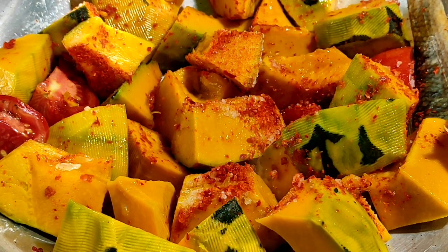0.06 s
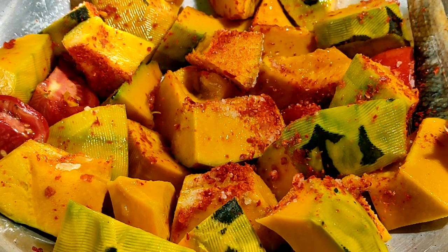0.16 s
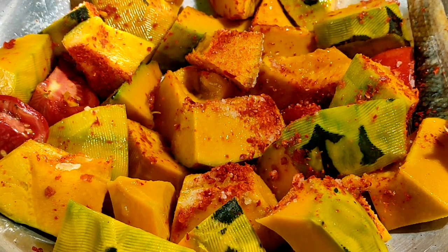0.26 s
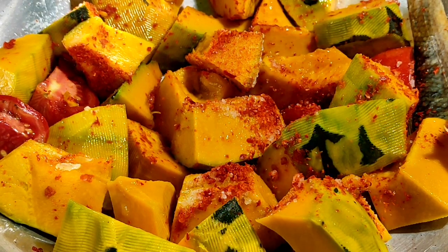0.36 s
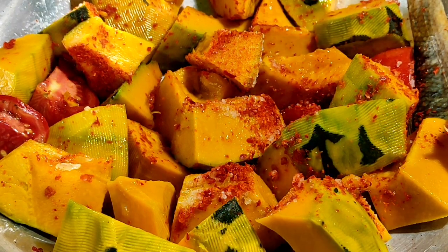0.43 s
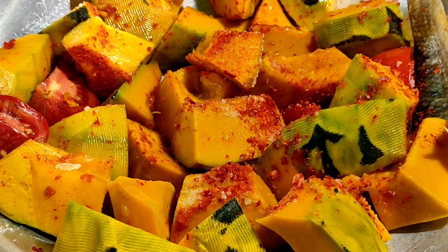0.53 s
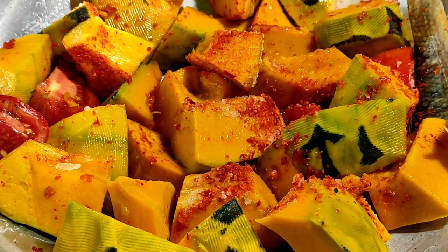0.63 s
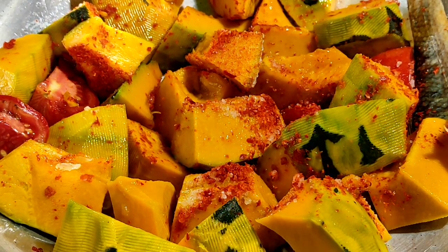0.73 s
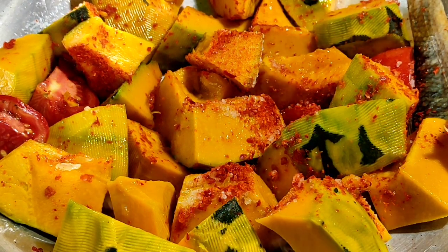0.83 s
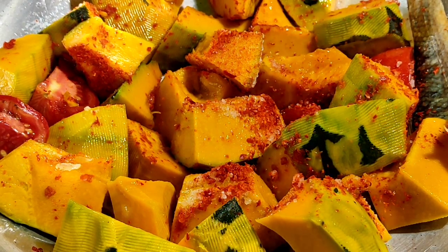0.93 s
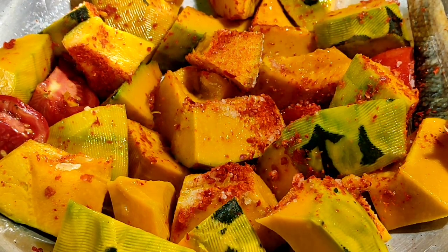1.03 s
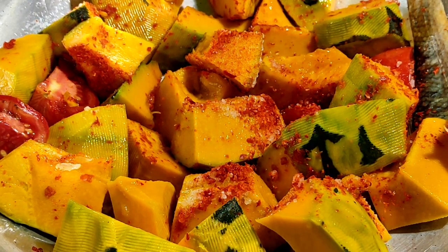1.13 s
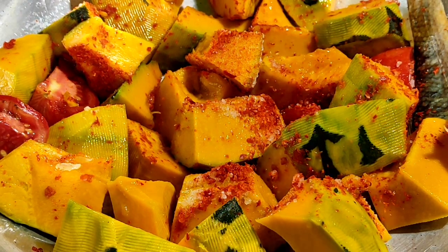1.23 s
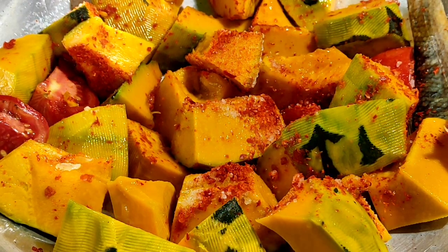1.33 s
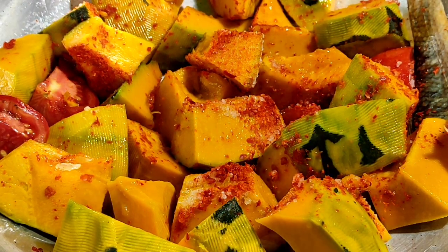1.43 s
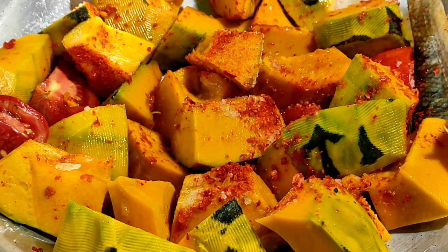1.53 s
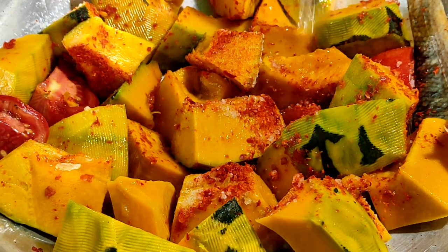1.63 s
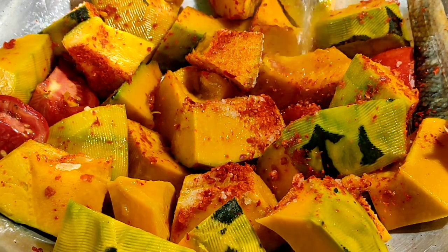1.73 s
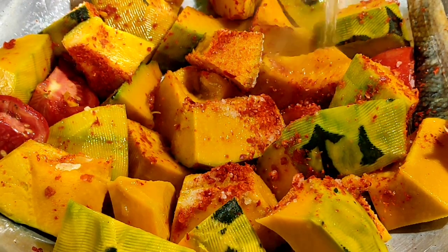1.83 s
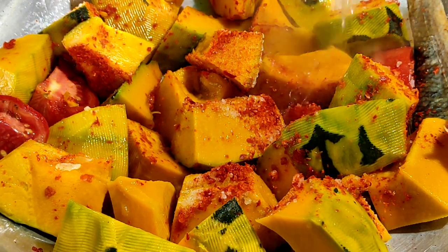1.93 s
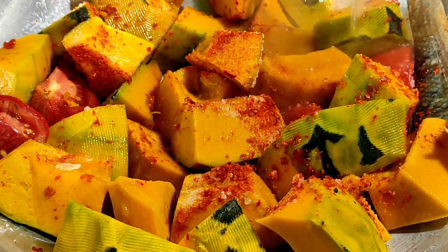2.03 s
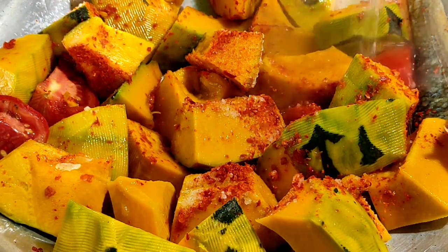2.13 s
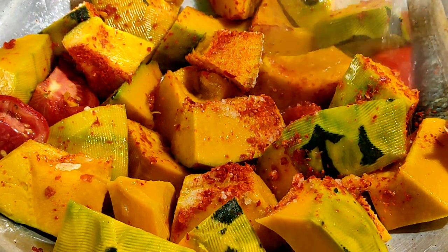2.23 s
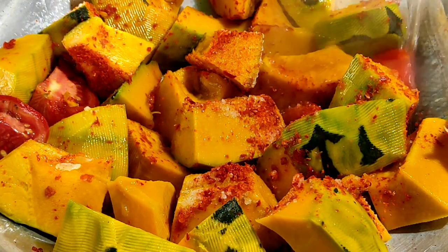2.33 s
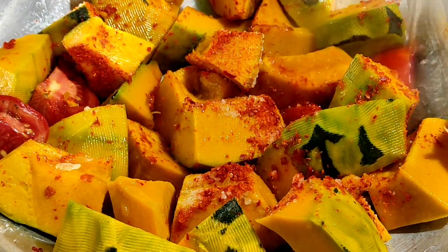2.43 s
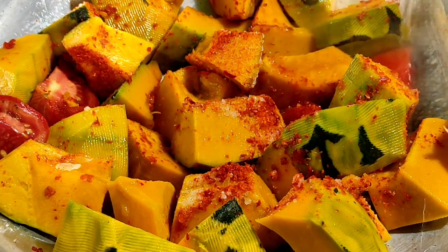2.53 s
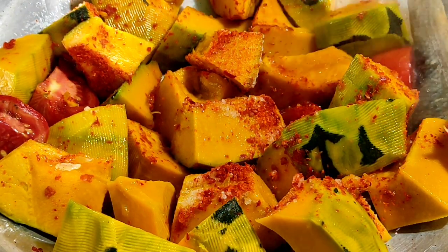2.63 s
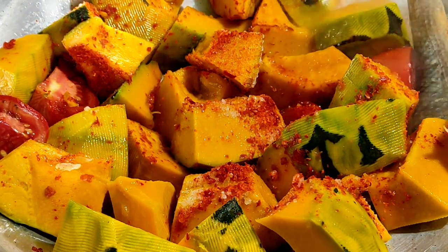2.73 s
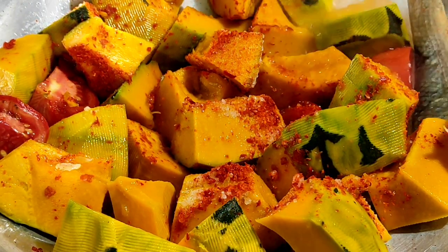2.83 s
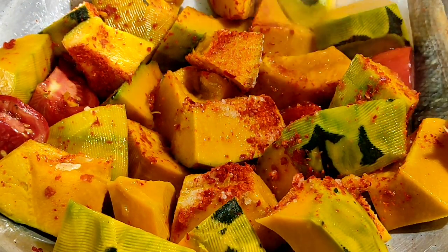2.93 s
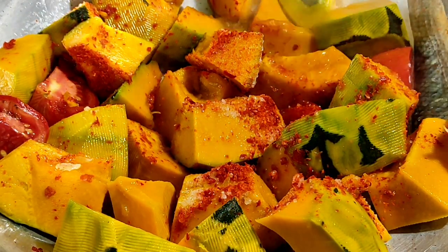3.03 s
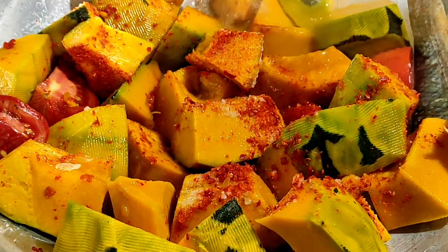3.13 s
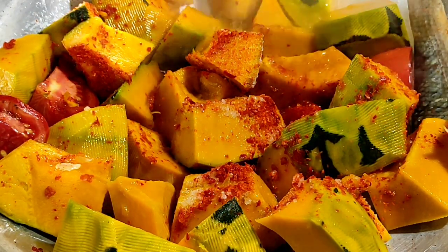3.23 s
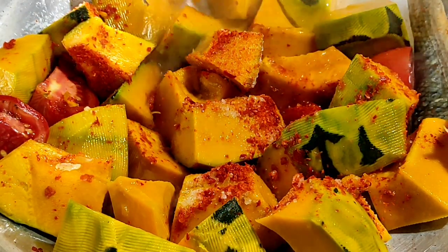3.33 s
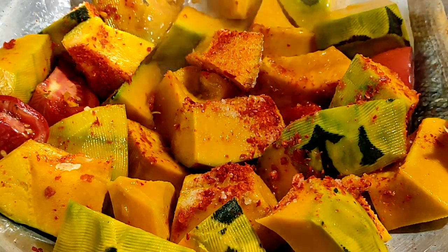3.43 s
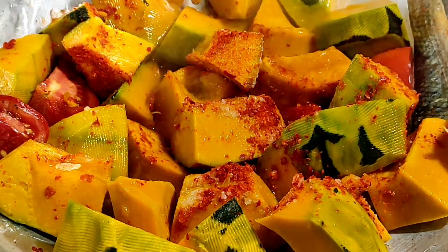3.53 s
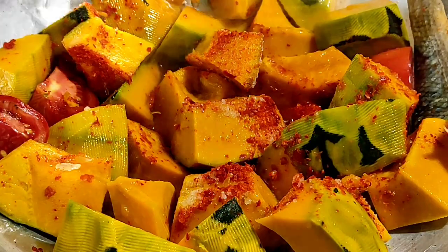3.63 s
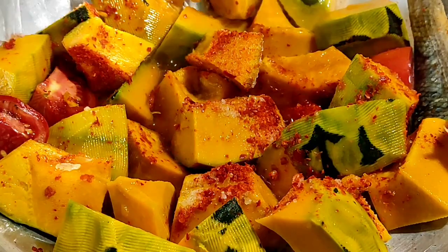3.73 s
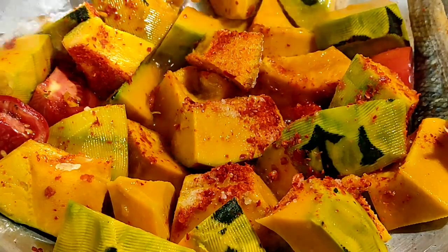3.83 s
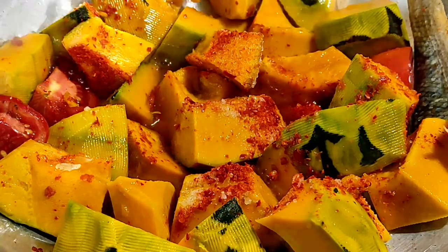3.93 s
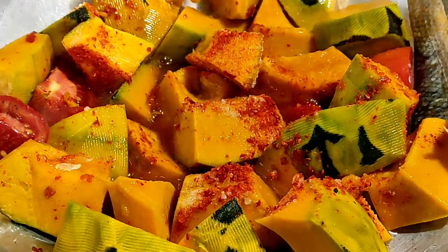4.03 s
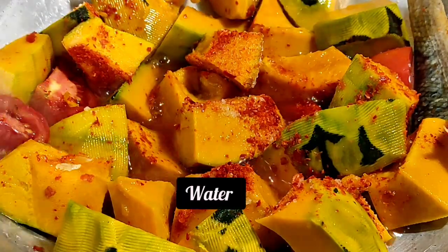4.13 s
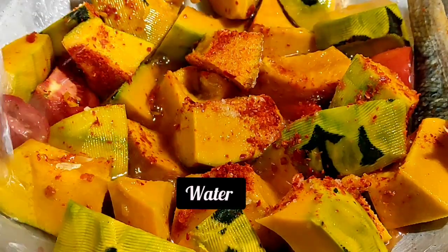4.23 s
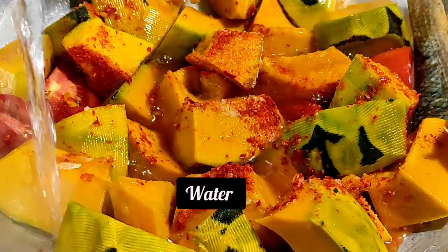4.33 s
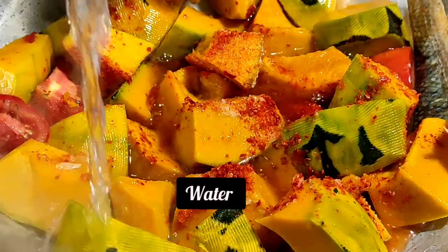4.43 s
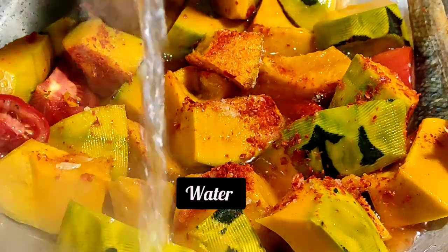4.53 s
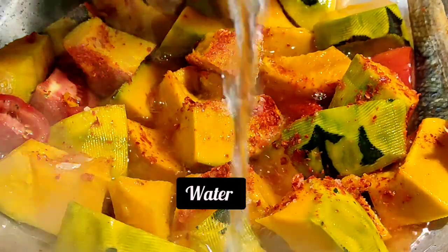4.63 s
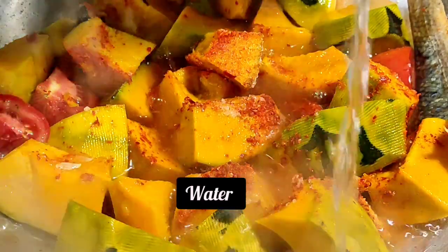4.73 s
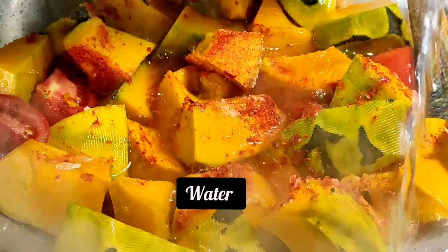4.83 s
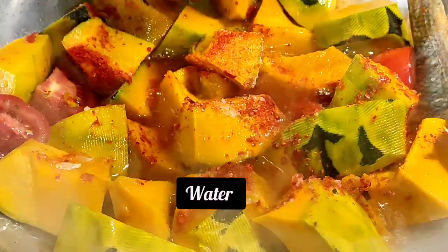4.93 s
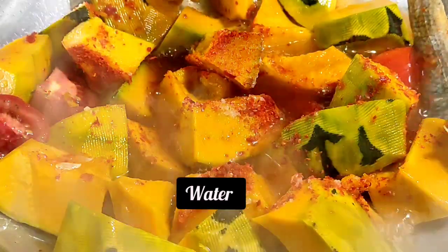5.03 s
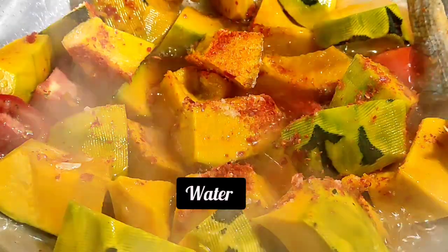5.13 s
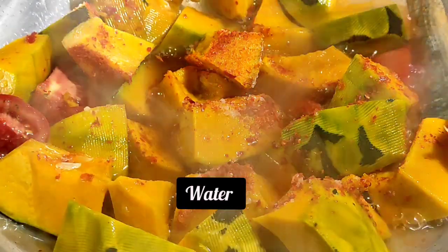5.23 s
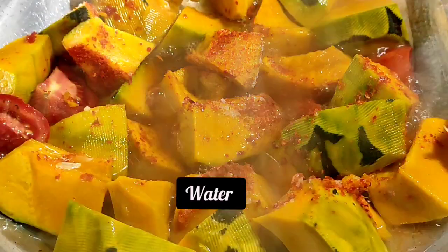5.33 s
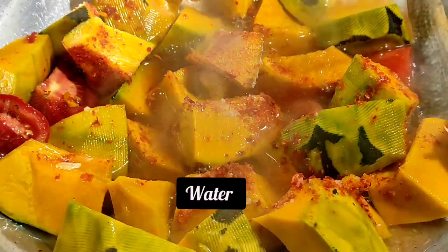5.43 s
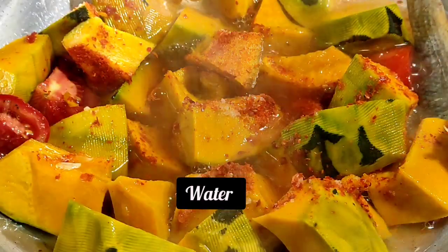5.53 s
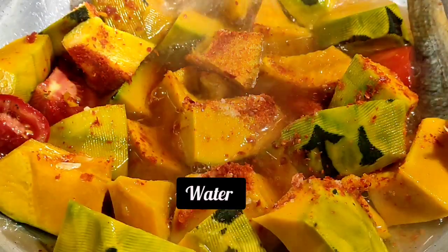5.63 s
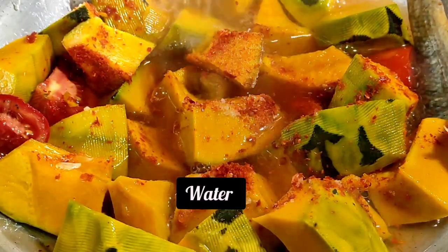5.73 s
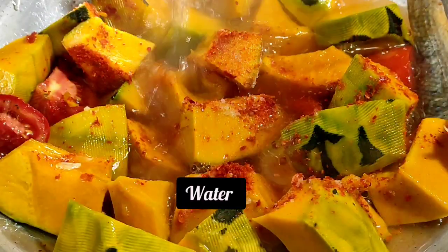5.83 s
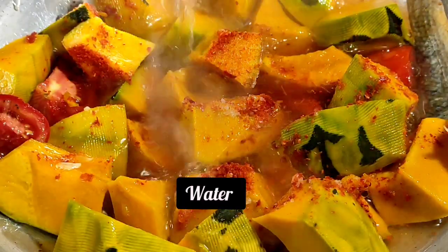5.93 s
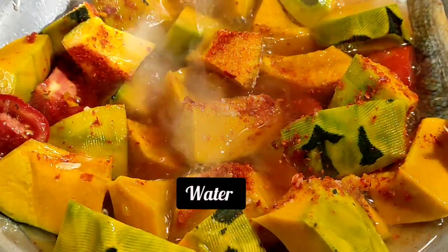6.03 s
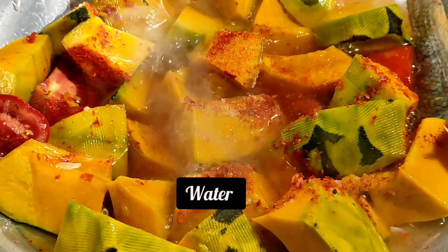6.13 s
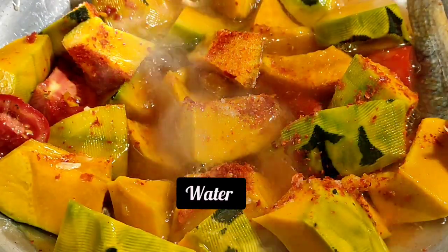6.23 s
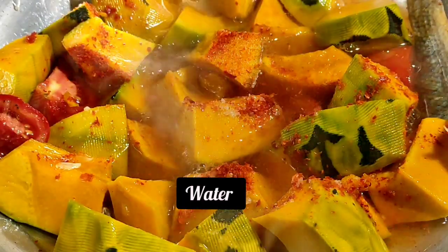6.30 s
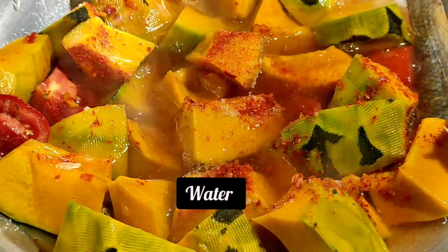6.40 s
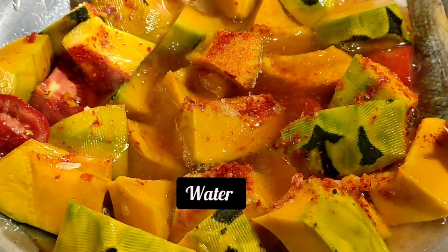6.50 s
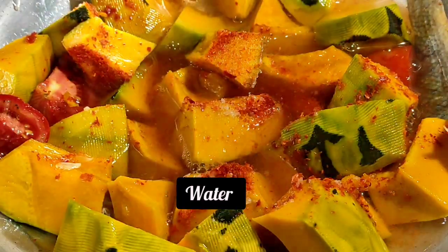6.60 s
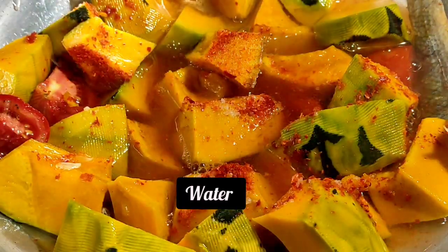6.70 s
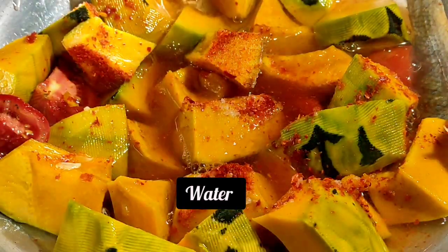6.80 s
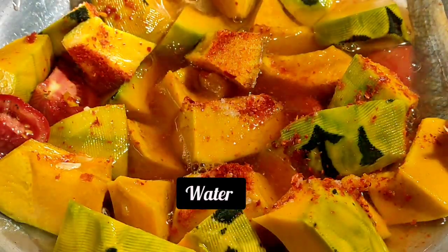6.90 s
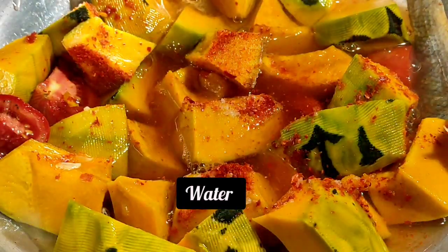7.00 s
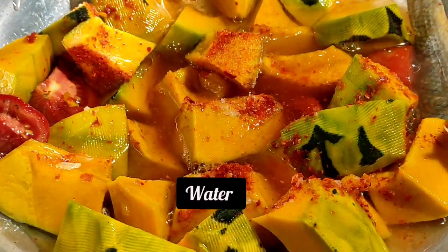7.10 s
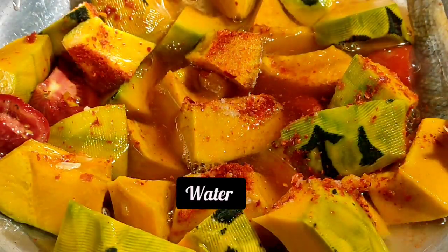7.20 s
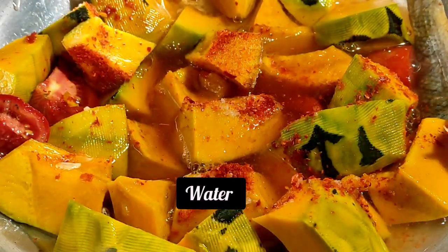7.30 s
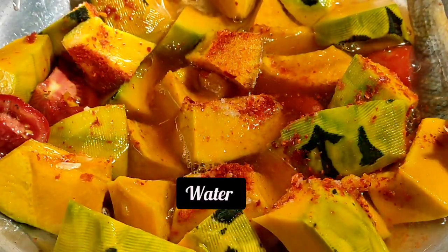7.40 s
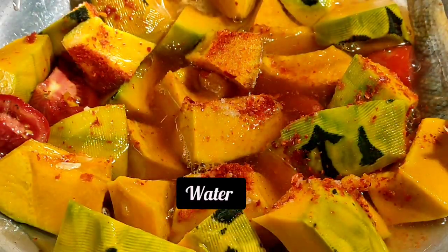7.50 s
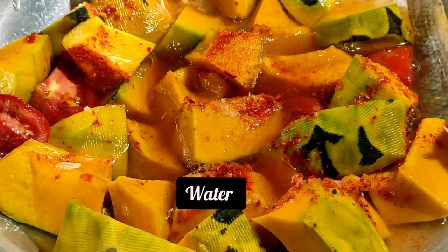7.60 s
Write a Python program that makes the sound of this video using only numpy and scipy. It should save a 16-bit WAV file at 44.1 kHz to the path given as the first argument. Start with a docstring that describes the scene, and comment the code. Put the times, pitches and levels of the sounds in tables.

```python
"""A steady sizzle over low room rumble opens the scene: water pours over hot chopped vegetables in a bowl.
It breaks into gushes of hissing, crackling spray and of ringing bubble clusters, chopped into slaps.
Drops snap as filtered clicks, pool bubbles ring as short rising sines, and the stream thins to a faint sizzle.
Soft knocks ring counter modes, handling adds slow bumps, and the quiet kitchen is coloured noise and a hum.
Two small microphone ports hear it, each with its own treble resonance."""
import sys
import numpy as np
from scipy import signal
from scipy.fft import rfft, irfft
from scipy.io import wavfile
from scipy.ndimage import uniform_filter1d

SR = 44100
rng = np.random.default_rng(int(sys.argv[2]) if len(sys.argv) > 2 else 0)


def put_to_file(sound):
    """Save the sound as 16-bit audio at rate SR, in the file named by the first command-line argument."""
    columns = np.atleast_2d(sound).T  # one column per channel
    safe = np.clip(columns, -1, 1)
    whole_steps = np.round(safe * 32767)
    wavfile.write(sys.argv[1], SR, whole_steps.astype(np.int16))


N = 337669

# Levels and balances (left re right) in the tables are settings; the layers below trim them further.
# the even stream, thinning to a faint sizzle
# [t/s, spray level/dB, gurgle level/dB, pool level/dB, balance/dB]
STREAM = [(0, -52.5, -54.5, -65, -5), (.9, -51.5, -56, -65, -7.5), (1.6, -49, -54.5, -64.5, -7.5),
          (1.9, -48.5, -53.5, -63.5, -8.5), (2.35, -47.5, -52.5, -62, -9.5), (2.6, -47.5, -52.5, -60, -4.5),
          (2.85, -53, -56, -62.5, -7), (3.1, -48.5, -54, -58.5, -7), (3.3, -54, -60.5, -61, -8.5),
          (4.05, -57, -57.5, -64, -12.5), (4.36, -57, -65.5, -68.5, -7), (4.6, -59.5, -66, -70.5, -8),
          (5.25, -61, -76, -69, -8), (5.5, -63, -86, -78, -4), (5.63, -69, -83, -73, -9),
          (6.2, -67, -83, -78, -6), (6.55, -72, -82, -79, -6.5), (7.66, -71, -85.5, -82.5, -7.5)]
# gushes, once the stream comes in bursts
# [start t/s, hold/s, spray level/dB, gurgle level/dB, pool level/dB, balance/dB]
GUSHES = [(0.306, 0.032, -72, -77, -63, 2), (0.772, 0.037, -69, -57, -60.5, -17),
          (1.756, 0.071, -49.5, -59.5, -71, -10), (2.154, 0.13, -58, -72, -59, -5),
          (2.685, 0.026, -51, -55.5, -60, -13), (2.887, 0.052, -50.5, -54, -72, -6),
          (3.324, 0.026, -48, -49, -66, 1), (3.406, 0.042, -50, -78, -61, -10),
          (3.543, 0.097, -57, -56, -63.5, -6), (3.705, 0.035, -50, -52, -62, -11),
          (3.782, 0.034, -48, -60, -81, -10), (3.856, 0.08, -49.5, -58.5, -72, -8),
          (4.061, 0.12, -53, -56, -64, -7), (4.22, 0.067, -51, -60.5, -78, -8),
          (4.374, 0.078, -48.5, -52.5, -57, -10), (4.626, 0.13, -51.5, -57, -67, -10.5),
          (4.809, 0.043, -49, -52.5, -64, -11.5), (4.913, 0.096, -54.5, -53, -83, 1),
          (4.97, 0.092, -50.5, -52, -63.5, -10), (5.116, 0.054, -48, -55.5, -82, -12),
          (5.265, 0.065, -50.5, -64, -61, -9), (5.35, 0.11, -54.5, -58, -69, -3),
          (5.661, 0.011, -61, -73, -78, -6), (5.734, 0.12, -50.5, -58.5, -63, -7.5),
          (5.885, 0.081, -63, -53.5, -69, -11), (5.956, 0.048, -48, -54.5, -61, -11),
          (6.023, 0.055, -59, -58.5, -60.5, -15), (6.1, 0.034, -49, -55.5, -56.5, -7.5),
          (6.134, 0.02, -52, -65.5, -79, -9), (6.281, 0.11, -65.5, -69.5, -87, -5),
          (6.922, 0.015, -53.5, -62, -72, -3), (6.953, 0.031, -58, -61.5, -80, -3),
          (6.988, 0.035, -66, -67, -85, -8)]
GUSH_RISE_DB_PER_S, GUSH_DRAIN_DB_PER_S = 1504, 258
# the stream breaks up into separate slaps [t/s, slaps over even flow level/dB, share landing in the pool 0-1]
BREAKUP = [(0, -50, 0.21), (1.5, -24.5, 0.29), (2.8, -18, 0.13), (3.3, -19, 0.7), (4.3, -8.5, 0.64),
           (6.2, -9, 0.5), (6.5, -35, 0.25), (7.66, -15, 0.65)]
# spectrum of the spray [f/Hz, level/dB per Hz]
SPRAY = [(2500, -30), (3500, -17.5), (5000, -7), (16000, 2.5)]
# spectrum of the gurgle on the pieces [f/Hz, level/dB per Hz]
FROTH = [(700, -25.5), (1100, -5), (1500, 1), (2050, 5), (2800, 4), (4000, -8), (6000, -7.5)]
# spectrum of the gurgle splashing into the pool [f/Hz, level/dB per Hz]
SPLASH = [(700, -32.5), (1100, -3), (1600, -10), (2300, 2.5), (3000, 2.5), (4200, 4), (6000, 0.5)]
# spectrum of the pool, with the bowl ringing near 600 Hz [f/Hz, level/dB per Hz]
POOL = [(300, -1.5), (470, -2), (560, 0), (615, 5), (680, 0), (800, -2.5), (1000, -1.5), (1400, -19.5)]
# colour of the splash as the stream wanders [t/s, level below 1.8 kHz/dB, level above 3.6 kHz/dB]
SPLASH_TILT = [(0, 0.5, -0.5), (.8, 0, -1), (1.6, 2.5, 0), (2.2, 0, 0), (2.5, 1.5, 0), (2.9, -0.5, -1),
               (3.3, -3, -0.5), (3.43, -4, -2), (3.55, -5, 1), (3.75, 1.5, -0.5), (3.9, 0.5, 1),
               (4.0, -2, 0), (4.1, -3, 1), (4.25, -4, -0.5), (4.4, 1.5, 0), (4.5, 0.5, -0.5),
               (4.65, 4.5, 1.5), (4.8, 1, 0.5), (4.92, 3, 0), (5.0, 3.5, -3.5), (5.1, -2, 1.5),
               (5.3, -1, 0), (5.45, 0, -0.5), (5.75, -3, 2), (5.82, 4, 2), (5.9, -3, -1.5), (5.97, -1, 0.5),
               (6.04, -2, 0.5), (6.11, -7, -0.5), (6.2, 4, 1), (6.35, 2.5, 0), (6.95, -3, 0.5),
               (7.66, -6, 0)]
# borders between ranges of bubble size, each answering to lumps of its own [f/Hz]
SPLASH_SPLITS_HZ = [1040, 1830, 3900]
# the hollow between the pieces where the stream lands [t/s, centre f/Hz, level re gurgle/dB]
HOLLOW = [(0, 2064, -15.5), (1.7, 2056, -6), (2.2, 2046, -6.5), (2.3, 1805, -4.5), (2.8, 1754, -6),
          (2.9, 1152, -7.5), (3.3, 1294, -9), (3.36, 1452, -23), (3.42, 1018, 4), (3.5, 1292, -10),
          (3.56, 2274, -17), (3.7, 1001, -11), (3.95, 1100, -11), (4.03, 1430, -36), (4.3, 1413, 2.5),
          (4.38, 1123, -9), (4.5, 1228, -8), (4.62, 1950, -26), (4.85, 1904, -15), (4.97, 2097, -8),
          (5.15, 2098, -20), (5.3, 1540, -1.5), (5.47, 1400, -14), (5.74, 1297, -8), (5.87, 980, -13),
          (5.95, 2000, -13), (6.05, 2005, -18), (6.1, 1252, -8), (6.3, 1513, -13), (6.95, 1340, -2),
          (7.05, 1105, -4)]
HOLLOW_WIDTH_HZ, HOLLOW_BUBBLES_PER_S = 330, 900

# spectrum of the room's rumble [f/Hz, level/dB per Hz]
RUMBLE = [(13, -28), (22, -5), (43, -16), (81, -8.5), (123, -13.5), (175, -8), (207, -9.5), (315, -19),
          (411, -18.5), (470, -26.5), (511, -23), (777, -30.5), (1200, -64), (1560, -102), (2640, -120)]
# spectrum of each port's own hiss [f/Hz, level/dB per Hz]
HISS = [(400, -29), (1000, 10.5), (3000, 5), (16000, -15)]
RUMBLE_DB, HISS_DB = -61, -80.5
HUM_HZ, HUM_T60_S, HUM_DB = 168.7, 0.13, -65.5
# how alike left and right noise are [f/Hz, likeness]
LIKENESS = [(60, 0.86), (180, 0.98), (550, 0.46), (1650, 0.051), (4970, 0.012), (15000, 0.055)]

# soft knocks on the counter [t/s, level/dB]
KNOCKS = [(0.332, -63), (0.803, -53), (6.548, -55), (6.577, -57.5), (7.645, -47)]
# resonances of the counter [f/Hz, level/dB, t60/s]
KNOCK_MODES = [(310, -1, .07), (393, 11.5, 0.045), (477, 1, 0.06), (585, 3, 0.046), (720, -13, 0.049)]
# drops snapping on the pieces
# [t/s, level/dB, balance/dB, slap level re drop/dB, smack level re drop/dB, smack f/Hz]
SNAPS = [(1.5484, -33, 2, -24, -26, 4870), (1.7136, -24, -9.5, -33, -12.5, 5040),
         (1.7214, -33, -9, -23, -27, 4520), (1.756, -37, -10, -8, -18, 5600),
         (1.8612, -24, -9.5, -34, -23, 4900), (1.869, -34, -6, -39, -10, 5100),
         (1.8986, -36.5, -21, -27, -24, 4880), (1.9115, -36, -16, -23, -13, 4830),
         (2.0266, -31, -1, -15, -13, 5100), (2.0837, -32.5, -1, -12, -21, 5550),
         (2.1227, -31, -10, -19, -21, 5530), (2.1665, -29, 4, -23, -26, 4900),
         (2.186, -27.5, -2, -8, -21, 4760), (2.209, -21, -5.5, -33, -23, 5700),
         (2.218, -33, -6.5, -13, -27, 5070), (2.332, -42, -12, -22, -30, 5400),
         (2.4085, -40, 2, -26, -3, 5400), (2.4126, -31, -21, -32, -8.5, 5700),
         (2.416, -32, -22, -27, -10, 5630), (2.4464, -38, -7.0, -19, -9, 5700),
         (2.4516, -33, -10, -13, -20, 5550), (2.5099, -28.5, 1, -12, -21, 5620),
         (2.5322, -33, 2, -16, -25, 5320), (2.557, -45, 2, -19, -14, 4830),
         (2.574, -32.5, -4, -25, -8.5, 5540), (2.584, -31, -11, -28, -14, 5600),
         (2.5974, -37, -6.5, -18, -13, 5700), (2.6064, -38, -9, -13, -16, 5520),
         (2.888, -33, 4, -20, -27, 5430), (3.0505, -25, 1, -30, -30, 3700),
         (3.1281, -34, 11, -21, -24, 3750), (3.1968, -37, -13, -23, -24, 4100),
         (3.2271, -35.5, -2, -23, -23, 5730), (3.2775, -41, 3, -25, -18, 5400),
         (3.3127, -36, -1, -25, -18, 5030), (3.321, -35, -3, -25, -15, 5500),
         (3.3273, -32, -8, -24, -6, 3780), (3.354, -34, 1, -17, -24, 5705),
         (3.4684, -40, 1, -11, -29, 4020), (3.4873, -36.5, -4, -24, -14, 4390),
         (3.5095, -42, -5, -20, -20, 5000), (3.546, -46, -10, -12, -9, 3800),
         (3.5728, -38, -7, -25, -26, 5000), (3.5952, -32.5, -1, -13, -11, 3940),
         (3.651, -39.5, -11, -20, -19, 3603), (3.7026, -44, -4, -14, -6, 5600),
         (3.711, -39, -8.5, -24, -11, 4950), (3.72, -37, -9, -22, -20, 5000),
         (3.735, -34, -5, -27, -24, 4400), (3.7391, -32.5, -7, -25, -20, 5500),
         (3.7815, -35, 5, -28, -19, 5030), (3.7855, -34.5, 0, -25, -20, 5000),
         (3.814, -38, -6, -22, -20, 5200), (3.884, -39, -4, -20, -20, 4810),
         (3.911, -32, -5, -28, -8.5, 4120), (3.9597, -33.5, 3, -14, -29, 5340),
         (4.066, -43, -5, -15, -11, 4000), (4.082, -41, 0, -22, -22, 5250),
         (4.0942, -32, -3, -24, -26, 5035), (4.13, -35, 11, -16, -26, 4970),
         (4.2144, -29.5, 0, -20, -25, 5010), (4.217, -32, 3, -22, -22, 4800),
         (4.2451, -31, 4, -4.5, -22, 5270), (4.2573, -33, -3, -18, -10, 5330),
         (4.2635, -38, -3, -20, -16, 5330), (4.3775, -27, 2, -25, -15, 5700),
         (4.3836, -37, -9, 3, -8, 4550), (4.405, -37, -6.5, -20, -7, 5200), (4.419, -37, -5, -23, -9, 4160),
         (4.4344, -38, -6.0, -26, -6, 5700), (4.4447, -31.5, -2.5, -18, -16, 4570),
         (4.4626, -32, 15, -24, -28, 5000), (4.5765, -42, -1, -24, -23, 5420),
         (4.616, -41, 7, -16, -15, 4620), (4.629, -37, 4, -16, -11, 4320), (4.6604, -30, 3, -23, -11, 4550),
         (4.676, -31, -3, -28, -16, 4730), (4.6962, -28, -1, -29, -14, 4340),
         (4.728, -35, -5, -20, -20, 5000), (4.792, -31.5, -11, -40, -35, 4470),
         (4.7996, -34, -8, -22, -21, 5690), (4.813, -28.5, -6, -25, -15, 5740),
         (4.821, -33, -8, -22, -22, 5500), (4.8385, -40, -2, -7, -22, 5000),
         (4.895, -36, -9.0, -31, -20, 4970), (4.9098, -40, -9, -22, -0.5, 3910),
         (4.9313, -32, -4, -21, -21, 5660), (4.9515, -37, -5, -15, -20, 5000),
         (4.9772, -47, -6, -18, -20, 5200), (5.002, -36, -6, -22, -18, 5210),
         (5.02, -21, -7, -34, -10.5, 5120), (5.0452, -34, 0, -19, -10, 4830),
         (5.064, -20, -11, -40, -15, 5590), (5.0744, -32, -6.0, -20, -18, 5150),
         (5.1135, -35, -13, -23, -12, 4370), (5.1357, -34.5, -13, -21, -18, 5350),
         (5.141, -35.5, -13, -21, -11, 4970), (5.2433, -41.5, -3, -9, -13, 5660),
         (5.2625, -45, -1, -25, -24, 5580), (5.2755, -27.5, 9, -28, -30, 5490),
         (5.306, -35, -11, -25, -22, 5600), (5.3486, -34, 0, -21, -25, 5370),
         (5.366, -27, 6, -22, -31, 5700), (5.3988, -36, -6.0, -17, -22, 5550),
         (5.4326, -34, 12, -25, -32, 3300), (5.449, -31, 12, -28, -35, 5590),
         (5.4554, -31, 6, -14, -26, 5660), (5.669, -33.5, -5, -31, -18, 5570),
         (5.711, -42, -1, -34, -16, 5650), (5.7301, -45, -6.5, -18, -18, 5590),
         (5.7496, -48, -11, -15, 1, 4220), (5.7565, -45.5, -9, -18, -1, 4200),
         (5.7758, -35, 0, -23, -13, 4670), (5.7985, -28, -5, -30, -26, 4650),
         (5.8994, -43, 1, -18, -24, 4090), (5.9062, -37, -3, -25, -22, 5330),
         (5.936, -43, -6.5, -10, -22, 3700), (5.9528, -32, 12, -21, -17, 5570),
         (6.001, -49, -3, -10, -12, 4100), (6.0454, -33, 0, -23, -21, 4950),
         (6.067, -28.5, 5, -26, -9.5, 5680), (6.0798, -44, -3, -22, -4, 5500),
         (6.1155, -33.5, -3, -18, -12.5, 5600)]
SMACK_T60_S = .006
# echo level of a drop set to 0 dB; weaker drops break up more, dB per dB
SNAP_WET_DB, SNAP_BLUR = -39, .65
# spray thrown up by a drop: offset from the drop's level, and its decay
SPATTER_DB, SPATTER_DRAIN_DB_PER_S = -16, 386
# the clearest bubbles in the pool [t/s, level/dB, starting f/Hz, t60/ms]
BUBBLES = [(1.844, -38, 1970, 13), (1.981, -44.5, 590, 23), (2.026, -36, 1960, 8.7),
           (2.124, -27.5, 2180, 7.1), (2.124, -29, 2650, 5.4), (2.161, -28, 2100, 6), (2.187, -27, 2130, 6),
           (2.216, -34, 1980, 15), (2.223, -29, 2010, 13), (2.274, -37, 1840, 13), (2.329, -41, 600, 18),
           (2.4, -39, 1730, 9), (2.464, -34, 2760, 6.8), (2.481, -33, 1883, 7.3), (2.503, -33, 1390, 6.5),
           (2.565, -42, 600, 13), (2.607, -38, 1710, 10), (2.632, -36, 1720, 6.9), (2.684, -37, 1920, 9.9),
           (2.706, -32, 2330, 6.2), (2.89, -39, 1110, 13), (3.071, -43, 1190, 12), (3.356, -41.5, 1460, 15),
           (3.378, -49, 1120, 16), (3.415, -41, 980, 21), (3.428, -39, 1310, 14), (3.44, -44, 1150, 14),
           (3.561, -35, 2270, 9.5), (3.703, -46, 1100, 4), (4.025, -41, 1380, 11), (4.07, -40, 1420, 14),
           (4.089, -35, 2360, 8), (4.13, -37, 2340, 8), (4.217, -37, 1330, 13), (4.246, -32, 1380, 19),
           (4.375, -32, 2000, 6), (4.387, -34.5, 1120, 14), (4.427, -47, 598, 20), (4.659, -40, 1950, 18),
           (4.698, -41.5, 593, 22), (4.839, -39, 1920, 11), (4.912, -49, 1050, 14),
           (4.985, -27.5, 2080, 9.1), (5.015, -33, 2118, 11), (5.037, -42, 590, 32), (5.082, -39, 1700, 8),
           (5.14, -34.5, 2070, 8.6), (5.228, -45, 1500, 8.8), (5.276, -33, 2590, 7), (5.349, -39, 1570, 8),
           (5.401, -43, 1000, 12), (5.434, -39, 1610, 7.2), (5.456, -40, 1400, 13), (5.672, -45, 2640, 7),
           (5.753, -38, 1400, 9), (5.759, -38.5, 1050, 9), (5.764, -36, 2300, 9.3),
           (5.864, -38.5, 930, 14.5), (5.898, -35, 2930, 6), (5.918, -42, 990, 12), (5.936, -32, 2760, 6.2),
           (5.953, -34, 2040, 8.7), (5.959, -38.5, 653, 16), (5.973, -37.5, 1040, 11),
           (6.001, -32, 2500, 6.8), (6.099, -38.5, 630, 19), (6.099, -39, 1000, 12),
           (6.101, -34, 1970, 6.3), (6.124, -42, 754, 12), (6.941, -55, 1150, 11.5), (6.956, -42, 1330, 12),
           (6.975, -41, 1800, 10), (6.999, -53, 1040, 12), (7.02, -55, 1120, 12)]
BUBBLE_SPREAD_DB = 2.5   # left-right scatter
FOLLOWER_LOSS_DB, FOLLOWER_WITHIN_S, FOLLOWER_DETUNE = 15, .05, 0.07
# dull bumps through the hand-held body; each starts 0.03 s ahead of t [t/s, level before the swell/dB, f/Hz]
BUMPS = [(2.899, -48, 29), (3.324, -42, 43), (3.698, -43, 48.2), (4.03, -46.5, 45.7), (4.42, -49, 26),
         (6.994, -48.5, 50.6)]

# response of the left port [f/Hz, level/dB]
LEFT_PORT = [(2500, -0.5), (4500, 3), (6000, 5), (7200, 6), (8500, 15), (9200, 11), (10000, -15.5),
             (11000, -9), (15000, -17), (16000, -26.5)]
# response of the right port [f/Hz, level/dB]
RIGHT_PORT = [(2500, -0.5), (4500, 8.5), (6000, 10), (6800, 16), (7400, 21), (8300, 11), (9200, -3),
              (10000, -1), (11000, -10), (15000, -17.5), (16000, -42)]
CUTOFF_HZ = 15700
HZ = np.maximum(np.fft.rfftfreq(N, 1 / SR), 10)   # FFT bins, kept above zero for the logarithm


def from_db(db):
    """Gain of a level."""
    return 10 ** (np.asarray(db) / 20)


def rms_one(x):
    """Scales to rms 1."""
    return x / np.sqrt(np.mean(x ** 2) + 1e-20)


def in_time(rows):
    """Reads the columns of a table over time at every sample."""
    s, *columns = np.transpose(rows)
    return np.array([np.interp(np.arange(N) / SR, s, c) for c in columns])


def at_hz(points):
    """Reads a table over log frequency at every FFT bin."""
    hz, values = np.transpose(points)
    return np.interp(np.log(HZ), np.log(hz), values)


def port(x, response):
    """A causal (minimum-phase) filter with the given response, made by folding its cepstrum."""
    cepstrum = irfft(np.log(from_db(at_hz(response))), N)
    cepstrum[1:N // 2] *= 2
    cepstrum[N // 2 + 1:] = 0
    return irfft(rfft(x) * np.exp(rfft(cepstrum)), N)


def colour(x, spectrum):
    """Shapes x to a spectrum, causally, at rms 1."""
    return rms_one(port(x, spectrum))


def stereo_noise():
    """Two noises whose likeness follows frequency, mixed from a middle and a side noise."""
    alike = at_hz(LIKENESS)
    mid, side = rfft(rng.standard_normal((2, N)))
    return irfft(np.sqrt(1 + alike) * mid + np.sqrt(1 - alike) * side * [[1], [-1]], N)


def drift(rate_hz):
    """Slow chance: noise under a double-pole lowpass, at rms 1."""
    r = np.exp(-2 * np.pi * rate_hz / SR)
    settled = signal.lfilter([1], [1, -2 * r, r * r], rng.standard_normal(N + SR))[SR:]
    return rms_one(settled)


def ring(clicks, hz, t60):
    """A resonator: a unit click sets a dying sine of height 1 ringing."""
    r, w = from_db(-60 / (t60 * SR)), 2 * np.pi * hz / SR
    return signal.lfilter([0, np.sin(w)], [1, -2 * r * np.cos(w), r * r], clicks + 1e-18)


def sides(pan_db):
    """Left and right gains of a balance."""
    return from_db(np.array([pan_db / 2, -pan_db / 2]))


def add(out, s, sound):
    """Lays a sound into the rows of out at s seconds."""
    i = round(s * SR)
    out[:, i:i + sound.shape[1]] += sound[:, :N - i]


def echoes(wet_db, t60, lag):
    """A direct path to each port, the left one lag samples later, and a cloud of echoes off wall and pieces."""
    t = np.arange(1500) / SR
    paths = from_db(wet_db - 60 * t / t60) * rng.standard_normal((2, 1500)) * (t > .0003)
    paths[0, max(lag, 0)] += 1
    paths[1, max(-lag, 0)] += 1
    return paths


def scatter(x, wet_db, t60, count=12):
    """Every 20 ms the sound is dealt to one of several places in the bowl, each with echoes of its own."""
    place = np.repeat(rng.integers(0, count, N // 882 + 1), 882)[:N]
    lags = rng.integers(-2, 12, count)
    out = 0
    for k in range(count):
        out = out + signal.oaconvolve([x * (place == k)], echoes(wet_db, t60, lags[k]), axes=1)[:, :N]
    return out


def grains(per_s, spread_db):
    """Random clicks, most of them small, coming in clumps."""
    sizes = from_db(spread_db * np.minimum(rng.exponential(1, N), 4)) * rng.choice([-1, 1], N)
    chance = per_s * from_db(5.0 * drift(25)) / SR
    return sizes * (rng.random(N) < chance)


def pouring():
    """Stream and gushes add in power; a gush rises fast, holds and drains; the louder one sets the side."""
    t, (*levels_db, pan_db) = np.arange(N) / SR, in_time(STREAM)
    power = from_db(levels_db) ** 2
    leaning = power[0] * pan_db
    for s, hold, *gush_db, gush_pan_db in GUSHES:
        near = slice(round((s - .1) * SR), round((s + hold + .5) * SR))
        before, after = np.maximum(s - t[near], 0), np.maximum(t[near] - s - hold, 0)
        off_db = GUSH_RISE_DB_PER_S * before + GUSH_DRAIN_DB_PER_S * after
        gush = from_db(np.array(gush_db)[:, None] - off_db) ** 2
        power[:, near] += gush
        leaning[near] += gush[0] * gush_pan_db
    pan_db = leaning / power[0]
    power[0] += spatter()
    return *(10 * np.log10(power)), pan_db


def spray(level_db, pan_db, breakup_db):
    """Fine droplets: a flickering hiss with crackle on top, coarser as the stream breaks up."""
    crackle = rms_one(scatter(grains(600, 2.7), wet_db=-18.0, t60=0.034))
    hiss = rng.standard_normal((2, N)) * from_db(2.3 * drift(46.0))
    share = 1 / (1 + from_db(-breakup_db - 11.5))   # crackle's part of the power
    mix = np.sqrt(1 - share) * colour(hiss, SPRAY) + np.sqrt(share) * colour(crackle, SPRAY)
    return from_db(level_db - 2.5) * sides(pan_db + 7.0) * mix


def gurgle(level_db, spectrum, low_hz, high_hz, per_s, cycles, rings_db, pan_db, wet_db):
    """Small bubbles: clicks dealt to 16 pitches ring a few cycles each over a patchy wash."""
    clicks, dealt = grains(per_s, 3.3), rng.integers(0, 16, N)
    pitches = np.geomspace(low_hz, high_hz, 16)
    rings = sum(ring(clicks * (dealt == k), hz, cycles / hz) for k, hz in enumerate(pitches))
    rings = rms_one(scatter(rings, wet_db=wet_db, t60=0.096))
    wash = rms_one(stereo_noise()) * from_db(2.17 * drift(33.0))
    mix = colour(wash, spectrum) + from_db(rings_db) * colour(rings, spectrum)
    return from_db(level_db) * sides(pan_db)[:, None] * rms_one(mix)


def slaps(breakup_db, most=5.4):
    """Gain of lumps landing at random: each lifts it at once and lets it sink; local rms evened out."""
    sizes = from_db(3.4 * np.minimum(rng.exponential(1, N), most)) * (rng.random(N) < 90 / SR)
    r = from_db(-60 / (0.028 * SR))   # sinks 60 dB in 28 ms
    lift = 1 + from_db(breakup_db) * rms_one(signal.lfilter([1], [1, -r], sizes))
    return lift / np.sqrt(uniform_filter1d(lift ** 2, size=4000))


def coloured_slaps(x, breakup_db):
    """Splits x by pitch, so that every range of bubble size gets lumps of its own."""
    out, (low_db, high_db) = 0, in_time(SPLASH_TILT)
    for hz, tilt_db in zip(SPLASH_SPLITS_HZ, [low_db, low_db, 0]):
        low = signal.sosfilt(signal.butter(3, hz, fs=SR, output="sos"), x)
        out = out + from_db(tilt_db) * slaps(breakup_db, most=5.0) * low
        x = x - low
    return out + from_db(high_db) * slaps(breakup_db, most=3.8) * x


def hollow(gurgle_db):
    """Bubbles burst in clusters close to the pitch of the hollow, which moves with the stream."""
    hz, level_db = in_time(HOLLOW)
    clicks = grains(HOLLOW_BUBBLES_PER_S, 2.4) * np.exp(2j * np.pi * rng.random(N))
    r = np.exp(-2 * np.pi * HOLLOW_WIDTH_HZ / SR)
    swell = signal.lfilter([1], [1, -2 * r, r * r], clicks + 1e-18)
    # the swells ride on a carrier that wavers around the hollow's pitch
    phase = 2 * np.pi * np.cumsum(hz * (1 + 0.1 * drift(60.1))) / SR
    rings = np.real(swell * np.exp(1j * phase))
    rings = signal.oaconvolve([rings], echoes(wet_db=-26.0, t60=0.035, lag=4), axes=1)[:, :N]
    return from_db(gurgle_db + level_db) * rms_one(rings)


def kitchen():
    """Low rumble and wavering hum of the house, and a faint hiss of its own in each port."""
    rumble = colour(stereo_noise(), RUMBLE) * sides(2.2)[:, None]
    hum = rms_one(ring(rng.standard_normal(N), HUM_HZ, HUM_T60_S))
    hum = from_db(HUM_DB + 1.2 * drift(3.7)) * hum
    hiss = colour(rng.standard_normal((2, N)), HISS)
    return from_db(RUMBLE_DB) * rumble + hum + from_db(HISS_DB) * hiss


def knocks():
    """Soft blows: a click and a dying scuff of noise drive the counter's modes."""
    push, t = np.zeros((2, N)), np.arange(5000) / SR
    for s, level_db in KNOCKS:
        scuff = rng.standard_normal((1, 5000)) + 5.8 * (t == 0)
        add(push, s, from_db(level_db - 34.0 - 60 * t / 0.21) * scuff)
    return sum(from_db(db) * ring(push, hz, t60) for hz, db, t60 in KNOCK_MODES)


def band(x, order, low_hz, high_hz):
    """A bandpass that keeps one layer of a snap in its range."""
    return signal.sosfilt(signal.butter(order, [low_hz, high_hz], "band", fs=SR, output="sos"), x)


def snaps():
    """Each drop is a sharp click with echoes of its own: a bright tick over a pitched smack and a duller slap."""
    tick, smack, slap = np.zeros((3, 2, N))
    for s, level_db, pan_db, slap_db, smack_db, smack_hz in SNAPS:
        click = echoes(wet_db=SNAP_WET_DB - SNAP_BLUR * level_db, t60=0.01, lag=6)
        click = from_db(level_db) * click / np.sqrt(np.sum(click ** 2) / 2)
        pitched = ring(click, smack_hz, SMACK_T60_S)
        add(tick, s + 0.000725, from_db(8.0) * sides(pan_db - 0.5)[:, None] * click)
        add(smack, s + 0.000695, from_db(smack_db + 6.0) * sides(0.66 * pan_db)[:, None] * pitched)
        add(slap, s + 0.00077, from_db(slap_db + 20.0) * click)
    return band(tick, 3, 5500, 11000) + band(smack, 2, 2900, 7000) + band(slap, 2, 1300, 3800)


def spatter():
    """Power of the spray that each drop throws up and lets fall."""
    power, t = np.zeros((1, N)), np.arange(6000) / SR
    for s, level_db, *_ in SNAPS:
        add(power, s + 0.00062, from_db([level_db + SPATTER_DB - SPATTER_DRAIN_DB_PER_S * t]) ** 2)
    return power[0]


def bubbles():
    """A bubble rings as a dying sine whose pitch climbs as it nears the surface; its echoes roughen it."""
    out, t = np.zeros((2, N)), np.arange(2000) / SR
    for s, level_db, hz, t60_ms in BUBBLES:
        place = sides(rng.normal(0, BUBBLE_SPREAD_DB))[:, None]
        group = [(s, level_db, hz)]
        # three weaker bubbles of near pitch follow behind
        for late, detune in zip(rng.random(3), rng.normal(0, 1, 3)):
            pitch_hz = hz * (1 + FOLLOWER_DETUNE * detune)
            group.append((s + FOLLOWER_WITHIN_S * late, level_db - FOLLOWER_LOSS_DB, pitch_hz))
        for start, db, pitch_hz in group:
            phase = 2 * np.pi * pitch_hz * (t + 2.5 * t * t)
            envelope = from_db(db - 60 * t / (t60_ms / 1000)) * (1 - np.exp(-t / 0.00072))
            paths = echoes(wet_db=-22.0, t60=0.037, lag=4)
            add(out, start, place * signal.fftconvolve([envelope * np.sin(phase)], paths, axes=1))
    return out


def bumps():
    """Handling: a few slow cycles of a sine that swell and die."""
    out, t = np.zeros((2, N)), np.arange(15000) / SR
    swell = t / 0.12 * np.exp(1 - t / 0.042)
    for s, level_db, hz in BUMPS:
        add(out, s - .03, from_db(level_db) * sides(4.4)[:, None] * swell * np.sin(2 * np.pi * hz * t))
    return out


def scene():
    """Stream, room, knocks, drops, bubbles and handling together."""
    spray_db, gurgle_db, pool_db, pan_db = pouring()
    breakup_db, in_pool = in_time(BREAKUP)
    froth = gurgle(gurgle_db - 0.1, FROTH, 1048, 4960, per_s=700, cycles=15.0,
                   rings_db=-9.0, pan_db=-4.0, wet_db=-28.0)
    splash = gurgle(gurgle_db - 2.0, SPLASH, 910, 4870, per_s=800, cycles=12.4,
                    rings_db=15.5, pan_db=3.5, wet_db=-22.5)
    pool = gurgle(pool_db, POOL, 506, 1320, per_s=320, cycles=6.6,
                  rings_db=-2.0, pan_db=1.5, wet_db=-49.0)
    landing = np.sqrt(1 - in_pool) * froth + np.sqrt(in_pool) * splash
    # spray, pool and landing water answer to different lumps
    flow = slaps(breakup_db) * spray(spray_db, pan_db, breakup_db)
    flow += slaps(breakup_db - 0.5, most=1.5) * pool
    flow += coloured_slaps(landing, breakup_db + 0.5)
    return flow + hollow(gurgle_db) + kitchen() + knocks() + snaps() + bubbles() + bumps()


def record(dry):
    """Each port lifts its own treble resonance and falls away above it; the top is cut."""
    ports = [port(dry[0], LEFT_PORT), port(dry[1], RIGHT_PORT)]
    return signal.sosfilt(signal.ellip(9, .5, 60, CUTOFF_HZ, fs=SR, output="sos"), ports)


dry = scene()
out = record(dry)
put_to_file(out)
```